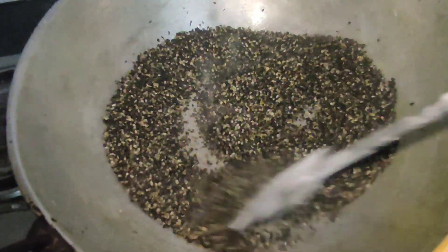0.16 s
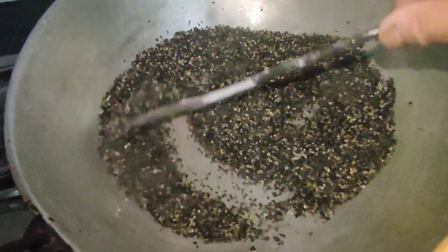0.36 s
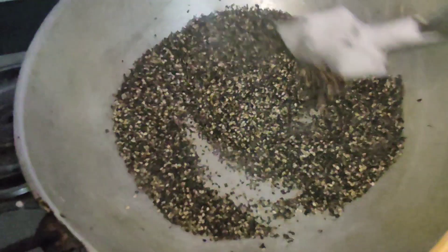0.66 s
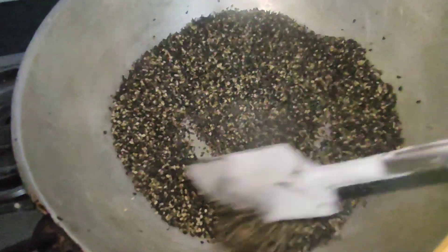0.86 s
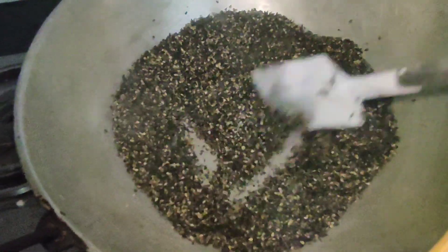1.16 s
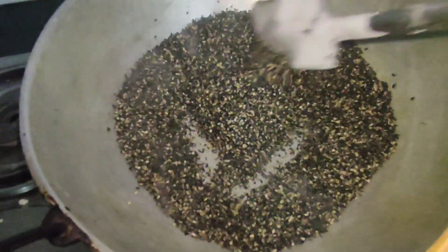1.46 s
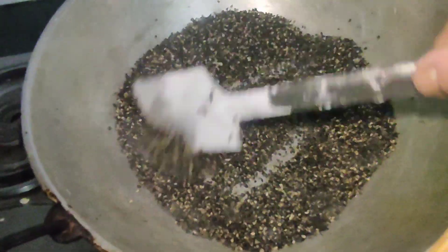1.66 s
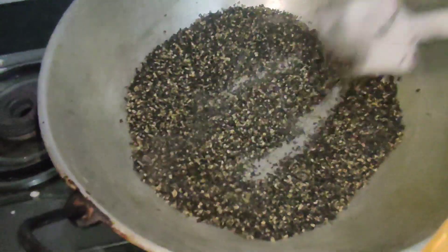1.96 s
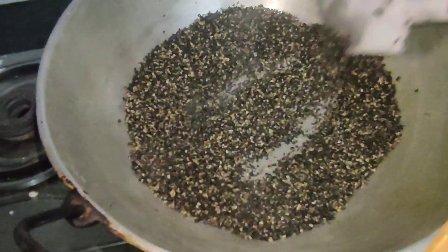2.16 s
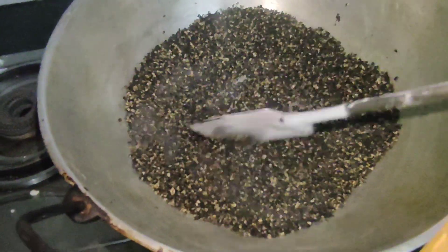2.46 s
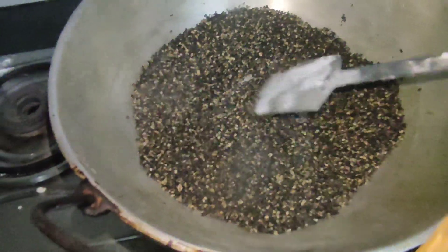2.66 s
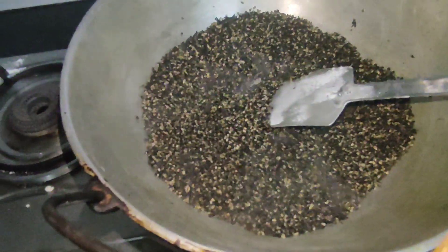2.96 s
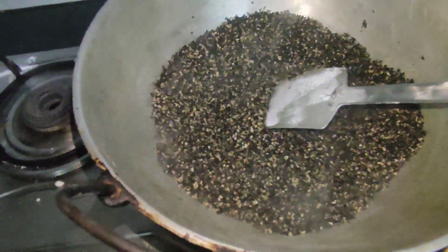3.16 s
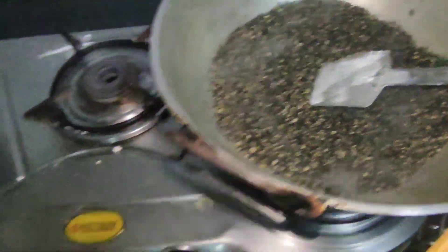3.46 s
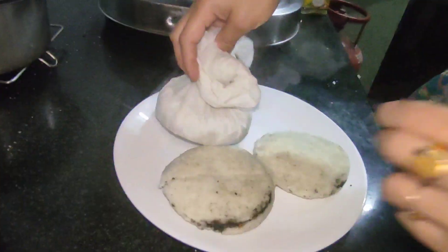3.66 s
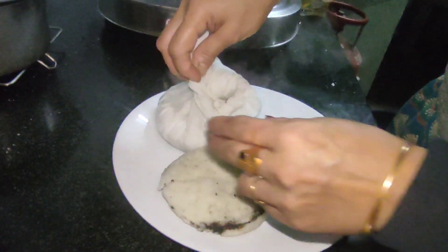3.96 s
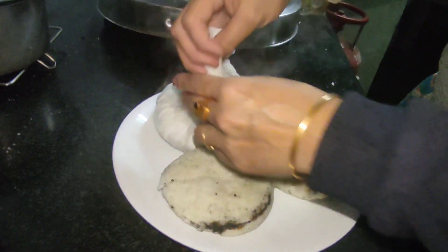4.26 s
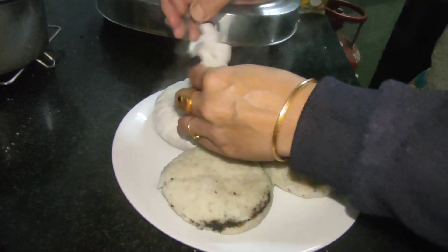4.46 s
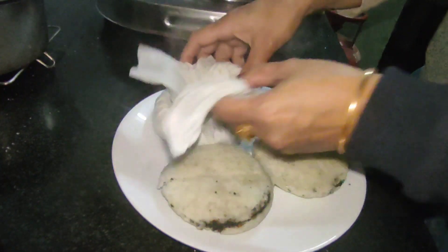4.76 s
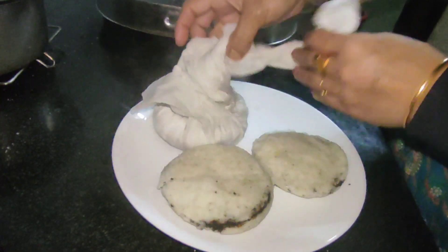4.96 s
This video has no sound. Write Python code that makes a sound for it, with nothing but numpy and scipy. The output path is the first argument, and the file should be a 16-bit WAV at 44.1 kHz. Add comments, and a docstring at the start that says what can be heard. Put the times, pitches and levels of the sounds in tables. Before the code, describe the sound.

Gritty seeds rush and patter under ringing metal scrapes in a home kitchen, then abruptly give way to quiet room hum, soft thuds and a tick.

```python
"""A stove-side kitchen hums as a steel spatula stirs sesame seeds in a thin wok: seeds rush and patter (coloured
grains), the edge judders, slips and knocks (grains, air pushes, noise cracks), wok and blade ring (decaying modes).
At 3.578 s the scene cuts to silence, then fades in on a quieter counter: the input offset settles after switch-on,
and hands at work give a dull bump (struck body modes, air push), a second bump and a bright tick (noise burst)."""
import sys
import numpy as np
from scipy import signal
from scipy.fft import rfft, irfft, next_fast_len
from scipy.io import wavfile
from scipy.ndimage import uniform_filter1d, map_coordinates

SR = 44100
rng = np.random.default_rng(int(sys.argv[2]) if len(sys.argv) > 2 else 0)


def wav_out(sig):
    """Save sig, one row per channel (or a flat mono array), as 16-bit PCM at SR to the path in sys.argv[1]."""
    wavfile.write(sys.argv[1], SR, np.round(np.clip(np.atleast_2d(sig).T, -1, 1) * 32767).astype(np.int16))


N = 224757

# Air near the stove. Each row: frequency in Hz, relative level in dB per Hz.
STOVE_SPECTRUM = [(71, -36.5), (120, -11.5), (166, -8), (437, -6), (535, -12.5), (905, -14.5),
                  (1360, -18.5), (5250, -18.5), (8020, -6.5), (9430, -17.5), (13800, -19), (15000, -47)]
# Air near the counter. Each row: frequency in Hz, relative level in dB per Hz.
COUNTER_SPECTRUM = [(71, -13), (120, -1.5), (229, -12), (350, -13.5), (455, -10.5), (569, -8.5), (739, -15),
                    (1250, -22.5), (1560, -19.5), (5800, -18.5), (7860, -11), (13800, -32.5), (15000, -21)]
# Tilt of the air noise to the left port. Each row: frequency in Hz, left over right in dB.
AIR_LEAN = [(300, 0), (2000, 2), (6000, 5)]
# Low hum of the house. Each row: frequency in Hz, relative level in dB per Hz.
DRONE_SPECTRUM = [(12, -38), (20, 4), (27, -14), (43, -6), (86, 4), (100, 0.5), (119, -17), (140, -20),
                  (180, -57), (310, -120)]
# Mean hum level near the stove. Each row: time in seconds, level in dB.
STOVE_HUM = [(0.0, -45), (0.12, -43.5), (0.34, -52), (0.36, -42), (1.72, -50.5), (1.91, -42.5), (2.19, -50),
             (2.43, -43), (2.45, -46.5), (2.89, -44.5), (3.56, -50.5), (3.57, -52)]
# Likeness of the two ports. Each row: frequency in Hz, left-right correlation (no unit).
LIKENESS = [(60, 0.92), (250, 0.93), (700, 0.41), (2000, 0.19), (5000, 0.086), (12000, 0.19)]

# Seed patter. Each row: frequency in Hz, relative level in dB per Hz.
SEED_SPECTRUM = [(1470, -26.5), (2500, -19), (2970, -27.5), (3230, -27), (3690, -32.5), (5100, 4.5),
                 (5530, -2), (7870, 8), (9640, -7.5), (13100, -13.5), (14600, -27.5), (15000, -56)]
# Blade judder. Each row: frequency in Hz, relative level in dB per Hz.
JUDDER_SPECTRUM = [(71, -46), (120, -14.5), (368, -0.5), (620, -2.5), (709, 2), (782, -3.5), (1230, -9),
                   (2200, -8.5), (2860, -57), (4840, -120)]
# Dense ring of the thin wall. Each row: frequency in Hz, relative level in dB per Hz.
SHEET_SPECTRUM = [(760, -25), (1300, -69.5), (1840, -6), (1980, -12.5), (2150, -4.5), (2990, -2), (3240, 4),
                  (4500, 0), (5850, -29), (9900, -120)]
# Modes of the wok. Each row: frequency in Hz, relative level in dB, t60 in seconds when struck.
WOK_MODES = [(477.6, -7, 0.078), (648, -14, 0.31), (902, -13, 0.52), (1177, -8.5, 0.23), (1217, -1.5, 0.27),
             (1557, -11, 0.12), (2102, -4.5, 0.17), (2540, -5.5, 0.23), (2820, -3.5, 0.13),
             (3100, -3, 0.19), (3450, -15, 0.12), (3640, -25, 0.16), (4180, 3, 0.097), (4510, 5, 0.082),
             (5500, -13, 0.042), (5820, -1, 0.19), (5670, 3.5, 0.087), (6190, 4.5, 0.12),
             (6800, -25.5, .15), (7400, -21, .15), (7500, -13.5, 0.13), (8060, -16, .15), (8270, 4.5, 0.11),
             (7650, 4.5, 0.11)]
# Blade lands, drags, lifts. Each row: landing in seconds, lift in seconds, seeds in dB at landing and at lift,
# judder in dB at both, wok ring in dB at both, settling seeds in dB under the lift level, small slips per second.
SCRAPES = [(0.1103, 0.44, -25, -28.5, -39.5, -38.5, -30.5, -34.5, 12.5, 0),
           (.5195, 0.644, -31.5, -29, -37.5, -36, -39, -42.5, 6, 130),
           (0.7115, 0.818, -23, -23, -33, -41, -33.5, -32, 13, 130),
           (1.101, 1.1, -32.5, -28.5, -37.5, -29.5, -49, -44, 13, 0),
           (1.828, 1.956, -39, -14.5, -34, -39.5, -48.5, -22, 15, 0),
           (2.248, 2.258, -31, -32, -49, -57, -49, -48.5, 8, 0),
           (3.0734, 3.118, -33.5, -18, -37, -35, -26, -22.5, 20.5, 0)]
# Seeds slide or surge. Each row: peak in seconds, rise in seconds, fall in seconds, then seeds, judder, ring in dB.
SWELLS = [(.09, .1, 0.025, -38, -61, -54.5), (.21, 0.028, 0.031, -32.5, -52, -30.5),
          (.32, 0.043, 0.075, -26, -39, -31), (0.501, 0.032, 0.041, -36, -60, -53),
          (.92, 0.067, 0.088, -37, -59, -63), (1.231, 0.08, 0.088, -41.5, -67, -48),
          (1.56, 0.11, 0.32, -42.5, -84, -53), (1.79, 0.048, .05, -38.5, -72, -63),
          (2.22, 0.066, 0.089, -43, -64, -74), (2.36, 0.13, 0.086, -43.5, -73, -51),
          (2.77, 0.057, 0.027, -46.5, -56, -56), (3.47, 0.18, 0.11, -48.5, -50, -54)]
# Levels while nothing is pushed. Entries: seeds, judder, ring in dB.
REST_DB = [-56, -63.5, -67.5]
# Burst at landing over the drag. Entries: seeds, judder, ring in dB.
LANDING_DB = [0.5, 2.5, -4.5]
# Quick stop after the lift. Entries: t60 of seeds, judder, ring in seconds.
LIFT_T60_S = [0.071, 0.13, 0.11]
# Slow settling after the lift. Entries: t60 of seeds, judder, ring in seconds.
SETTLE_T60_S = [0.79, 0.33, 0.64]
# Offset of the settling level. Entries: seeds, judder, ring in dB.
SETTLE_EXTRA_DB = [1, -2, -3]
# Stereo lean by loudness. Each row: seeds level in dB, left over right in dB.
LEAN = [(-61.5, 12), (-42, 4), (-32, 2)]

# Blade strikes metal. Each row: start in seconds, relative crack level in dB, relative ring level in dB.
BLOWS = [(0.1117, -3, -32), (0.5177, -21.5, -39), (0.709, -13.5, -42), (0.7216, -18, -29.5),
         (0.808, -19, -36), (1.102, -12, -44.5), (1.829, -28, -52), (1.863, -28, -50), (1.948, -14, -46),
         (1.959, -14, -46), (2.2482, -12, -42), (2.265, -14, -54), (3.0735, -8, -27), (3.086, -10.5, -27.5),
         (3.102, 3, -25), (3.11, 3, -35.5)]
# Loudest catches of the edge. Each row: time in seconds, relative peak in dB.
SLIPS = [(.1132, -24), (.5201, -16), (.53, -15), (.5405, -21), (.5684, -19), (.5927, -20), (.6357, -21),
         (.7112, -18), (.7229, -18), (.8064, -23), (1.1038, -21), (1.8308, -17), (3.0736, -24)]
# Chatter of the blade. Each row: start in seconds, relative level in dB.
CHATTER = [(.7685, -20), (.775, -21), (.783, -14), (.792, -12), (.7985, -12), (.8065, -10), (.8175, -12),
           (1.213, -36), (1.226, -33), (1.24, -35)]
# Modes of the blade. Each row: frequency in Hz, relative level in dB, t60 in seconds.
BLADE_MODES = [(3200, -3, .022), (3500, -5, .018), (4000, -10, .012)]
# Kitchen reverberation. Each row: frequency in Hz, t60 in seconds.
KITCHEN_T60 = [(200, 0.32), (2000, 0.49), (10000, 0.36)]

# Offset swing, left row then right. Each row: relative depth, rise in seconds, decay in seconds, swing in Hz.
SAG = [(-.02, 0.34, 0.43, .1), (-0.039, 0.13, .45, 0.506)]
# Hands on the counter. Each row: time in seconds, relative body level in dB, relative push level in dB.
BUMPS = [(3.853, -33.5, -23), (4.457, -17, -40)]
# Modes of the counter. Each row: frequency in Hz, bandwidth in Hz, relative level in dB.
COUNTER_MODES = [(149, 83, -1.5), (235, 67, 0), (337, 24, 0), (527, 51, 3), (612, 21, 1), (873, 44, 4.5),
                 (1380, 150, -13), (1850, 81, -16)]
# Dry tick. Each row: start in seconds, left level in dB ahead of the high-pass.
TICKS = [(4.583, -29)]

LEAD_S = 6e-5  # left port hears first
LANDING_T60_S = 0.083
SMALL_SLIP_DB, SMALL_SLIP_RANGE_DB = -25, 4  # mean, plus or minus
CUT_S, FADE_S = 3.578, (3.59, 3.87)
COUNTER_HUM_DB, HUM_WAVER_DB = -54.5, 1.5
SWITCH_ON_S = 3.605
JERK_S, JERK_SIZE, JERK_DECAY_S = 3.684, .007, .04
TICK_LEAN_DB = 10
TOP_HZ = 15283


def amp(db):
    """dB to amplitude."""
    return 10 ** (np.asarray(db) / 20)


def unit(x):
    """Scales to rms 1."""
    return x / np.sqrt(np.mean(x ** 2) + 1e-20)


def along(points, hz):
    """Interpolates (Hz, value) points on a log axis."""
    f, v = np.transpose(points)
    return np.interp(np.log(hz + 1), np.log(f + 1), v)


def wobble(rate_hz):
    """A smooth random curve, rate_hz knots a second."""
    knots = rng.standard_normal(int(N * rate_hz / SR) + 4)
    return map_coordinates(knots, [np.arange(N) * rate_hz / SR])


def filtered(x, response):
    """x times a complex response of frequency."""
    m = next_fast_len(N + SR)
    return irfft(rfft(x, m) * response(np.fft.rfftfreq(m, 1 / SR)), m)[..., :N]


def add(out, start_s, sound):
    """Adds a sound at start_s."""
    out[:, round(start_s * SR):][:, :sound.shape[1]] += sound


def stereo(pair, spectrum, patchy_db):
    """Colours two unrelated signals with shifting bands of random gain, mixes to two ports; rms of their mean is 1."""
    z = signal.stft(pair, nperseg=512)[2]
    field = rng.standard_normal(z.shape[1:])
    field = uniform_filter1d(uniform_filter1d(field, size=2, axis=0), size=9, axis=1)
    pair = signal.istft(z * amp(patchy_db * unit(field)), nperseg=512)[1][:, :N]

    def mix(hz):
        turn = np.arccos(np.clip(along(LIKENESS, hz), -1, 1)) / 2
        return amp(along(spectrum, hz)) * [np.cos(turn), np.sin(turn)]

    mid, side = filtered(pair, mix)
    ports = np.array([mid + side, mid - side])
    ports = filtered(ports, lambda hz: np.exp(1j * np.pi * LEAD_S * np.outer([1, -1], hz)))
    return ports / np.sqrt(np.mean(ports.mean(axis=0) ** 2))


def air(spectrum, db):
    """Soft steady room noise, brighter at the left port."""
    noise = stereo(rng.standard_normal((2, N)), spectrum, patchy_db=2.15)
    return amp(db) * filtered(noise, lambda hz: amp(np.outer([.5, -.5], along(AIR_LEAN, hz))))


def drone():
    """House hum: low coloured noise of wavering level."""
    noise = stereo(rng.standard_normal((2, N)), DRONE_SPECTRUM, patchy_db=1.3)
    return amp(HUM_WAVER_DB * wobble(7.04)) * noise


def efforts():
    """Levels in dB of seeds, judder, ring: powers of scrapes and swells add to the resting rustle."""
    t = np.arange(N) / SR
    col = lambda v: np.reshape(v, (-1, 1))
    power = amp(2 * col(REST_DB)) * np.ones(N)
    for land, lift, *db, under_db, _ in SCRAPES:
        first, last = col(db[0::2]), col(db[1::2])
        drag = amp(first + (last - first) * np.clip((t - land) / max(lift - land, 1e-3), 0, 1))
        after = np.maximum(t - lift, 0)
        share = amp(col(SETTLE_EXTRA_DB) - under_db)
        stop = (1 - share) * amp(-60 * after / col(LIFT_T60_S))
        settle = share * amp(-60 * after / col(SETTLE_T60_S))
        burst = amp(first + col(LANDING_DB) - 60 * np.abs(t - land) / LANDING_T60_S)
        power += (t >= land) * ((drag * (stop + settle)) ** 2 + burst ** 2)
    for peak, rise, fall, *db in SWELLS:
        u = np.clip((t - peak) / np.where(t < peak, rise, fall), -1, 1)
        power += (amp(col(db)) * np.cos(u * np.pi / 2)) ** 2
    return 10 * np.log10(power)


def grains(rate_hz, spread_db):
    """Two unrelated trains of tiny impacts of uneven strength."""
    hit = rng.random((2, N)) < rate_hz / SR
    strength = rng.standard_normal((2, N)) * amp(spread_db * rng.standard_normal((2, N)))
    return hit * strength


def seeds(db):
    """Rush and patter: dense tiny impacts with a fast level flutter."""
    return amp(db + 0.77 * wobble(130)) * stereo(grains(12000, 2.5), SEED_SPECTRUM, patchy_db=3.5)


def wall_rub(db):
    """Dense ring of the thin wall under many small impacts."""
    return amp(db) * stereo(grains(9000, 1.0), SHEET_SPECTRUM, patchy_db=6.5)


def wok_response(hz, damping):
    """Sum of wok resonances; bandwidths scale with damping, ring times with its inverse."""
    total = 0
    for k, (centre, db, t60) in enumerate(WOK_MODES):
        width = damping * np.log(1000) / np.pi / t60
        total = total + (-1) ** k * amp(db) * 1j * hz * width / (centre * centre - hz * hz + 1j * hz * width)
    return total


def wok_ring(db):
    """Noise shakes the wok's resonances."""
    shake = amp(db) * rng.standard_normal((2, N))
    return amp(16.5) * filtered(shake, lambda hz: wok_response(hz, damping=0.71))


def judder(db):
    """The blade edge slips in uneven jerks: sparser, lower grains."""
    return amp(db) * stereo(grains(3000, 1.6), JUDDER_SPECTRUM, patchy_db=3)


def stirring():
    """Seeds, wall and wok share a loudness-dependent lean; judder stays central. Returns sound and lean gains."""
    seeds_db, judder_db, ring_db = efforts()
    side = amp(np.outer([.5, -.5], np.interp(seeds_db, *np.transpose(LEAN))))
    flutter_db = 0.17 * wobble(45)  # the hand's pressure is never even
    leaning = seeds(seeds_db + flutter_db) + wall_rub(ring_db + flutter_db) + wok_ring(ring_db)
    return leaning * side + judder(judder_db + flutter_db), side


def ringing(table, t):
    """Decaying modes, struck at new strengths each time, with a different phase at each port."""
    total = 0
    for hz, level_db, t60 in table:
        envelope = amp(level_db + rng.normal(0, 2.5) - 60 * t / t60)
        total = total + envelope * np.sin(2 * np.pi * hz * t + rng.normal(0, 1.0, (2, 1)))
    return total * (1 - np.exp(-t / 0.00049))


def strikes():
    """Blade on metal: a short bright noise crack and a ring of the wok."""
    crack, clang, t = np.zeros((2, N)), np.zeros((2, N)), np.arange(SR // 2) / SR
    for s, crack_db, ring_db in BLOWS:
        add(crack, s, amp(crack_db - 6.0 - 60 * t / 0.022) * rng.standard_normal((2, len(t))))
        add(clang, s, amp(ring_db) * ringing(WOK_MODES, t))
    band = lambda hz: 1 / (1 + (hz / 8600) ** 16) / (1 + (2500 / (hz + 1)) ** 2)
    return filtered(crack, band) + clang


def pushes(events, hz):
    """One cycle of pull and release centred on each event."""
    x, u = np.zeros(N), np.arange(-200, 200) / SR * 2 * np.pi * hz
    for s, db in events:
        x[round(s * SR) - 200:][:400] += amp(db) * u * np.exp(.5 - u * u / 2)
    return x


def small_slips():
    """Unevenly spaced catches of the edge along the drags with a slip rate."""
    rows = []
    for land, lift, *_, rate in SCRAPES:
        gap, size = rng.random((2, 60))
        times = land + np.cumsum(.5 + gap) / (rate + 1e-3)
        levels_db = SMALL_SLIP_DB + SMALL_SLIP_RANGE_DB * (2 * size - 1)
        rows += [(s, db) for s, db in zip(times, levels_db) if s < lift]
    return rows


def slips():
    """Each catch of the edge pushes the air once, 3 samples earlier at the left port."""
    push = pushes(SLIPS + small_slips(), hz=654)
    return np.array([np.roll(push, -3) * amp(-1.5), push * amp(-3.0)])


def kitchen(x):
    """Reverberation: a noise tail, each frequency dying at its own speed, 300 samples late."""
    hz, t, z = signal.stft(rng.standard_normal((2, SR // 2)), SR, nperseg=256)
    tail = signal.istft(z * amp(-60 * t / along(KITCHEN_T60, hz)[:, None]), SR, nperseg=256)[1]
    late = np.pad(x, ((0, 0), (300, 0)))
    return signal.fftconvolve(late, tail / np.linalg.norm(tail[0]), axes=1)[:, :N]


def chatter():
    """Repeated knocks ring the blade's modes."""
    blade, t = np.zeros((2, N)), np.arange(SR // 2) / SR
    for s, db in CHATTER:
        add(blade, s, amp(db) * ringing(BLADE_MODES, t))
    return blade


def offset():
    """Microphone input settling after switch-on: a slow sag swings back, the right port jumps once."""
    t = np.arange(N) / SR
    u = np.maximum(t - SWITCH_ON_S, 0)
    left, right = [depth * (1 - np.exp(-u / rise)) * np.exp(-u / decay) * np.cos(2 * np.pi * hz * u)
                   for depth, rise, decay, hz in SAG]
    jerk = (t > JERK_S) * JERK_SIZE * np.exp(-np.abs(t - JERK_S) / JERK_DECAY_S)
    return np.array([left, right + jerk])


def counter_response(hz):
    """Counter resonances struck softly."""
    body = 0
    for k, (centre, width, db) in enumerate(COUNTER_MODES):
        body = body + (-1) ** k * amp(db) * 1j * hz * width / (centre * centre - hz * hz + 1j * hz * width)
    return body / (1 + 1j * hz / 1500) ** 2  # skin is a soft striker


def bumps():
    """Hands strike the counter: impulses through its body plus a push of air."""
    strike = np.zeros(N)
    for s, db, _ in BUMPS:
        strike[round(s * SR)] = amp(db + 29.0)
    push = pushes([(s, db) for s, _, db in BUMPS], hz=394)
    return filtered(strike, counter_response) + amp(-10.5) * push


def tick():
    """A small bright tick from the left: a decaying noise burst above 4500 Hz."""
    burst, t = np.zeros((2, N)), np.arange(600) / SR
    for s, db in TICKS:
        ports_db = db - TICK_LEAN_DB * np.array([[0], [1]])
        add(burst, s, amp(ports_db - 60 * t / .012) * rng.standard_normal((2, len(t))))
    return filtered(burst, lambda hz: hz > 4500)


def scene():
    """The stove until the cut, then the counter fading in."""
    t = np.arange(N) / SR
    hum = drone()
    stir, side = stirring()
    hits = strikes() * side + slips()
    blade = chatter()
    blows = hits + amp(-8.5) * kitchen(hits) + blade + amp(-17) * kitchen(blade)
    stove_hum_db = np.interp(t, *np.transpose(STOVE_HUM))
    stove = air(STOVE_SPECTRUM, db=-49.5) + amp(stove_hum_db) * hum + stir + blows
    touches = bumps() + tick()
    counter = air(COUNTER_SPECTRUM, db=-53.0) + amp(COUNTER_HUM_DB) * hum
    counter = counter + touches + amp(-5.5) * kitchen(touches)
    return stove * (t < CUT_S) + counter * np.interp(t, FADE_S, (0, 1))


def record(dry):
    """Adds the input offset, rounds the highest peaks, rolls the treble off to the band limit."""
    x = dry + offset()
    x = x / (1 + np.abs(x / .9) ** 6) ** (1 / 6)
    return filtered(x, lambda hz: (hz < TOP_HZ) / (1 + (hz / 14500) ** 60))


dry = scene()
out = record(dry)
wav_out(out)
```